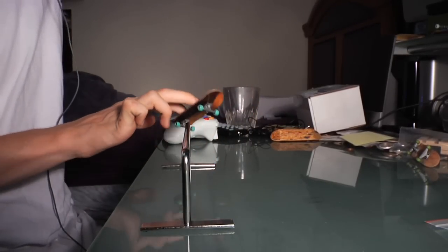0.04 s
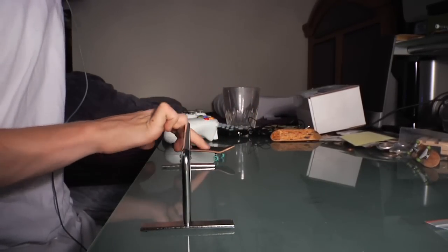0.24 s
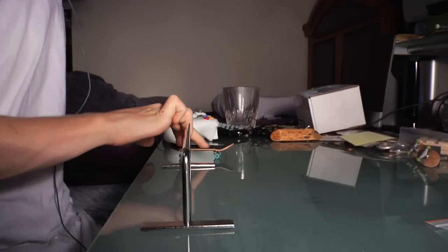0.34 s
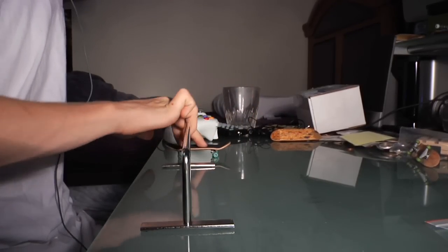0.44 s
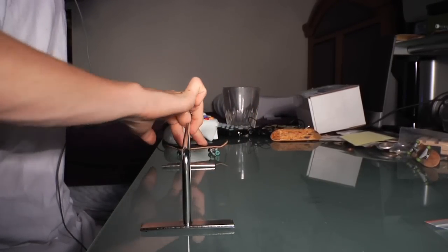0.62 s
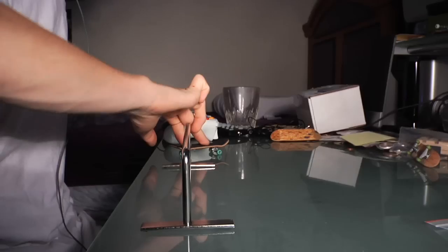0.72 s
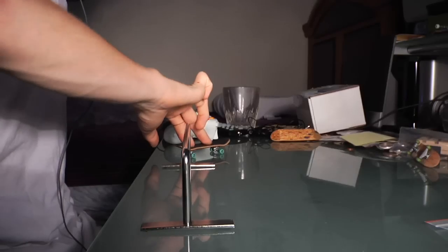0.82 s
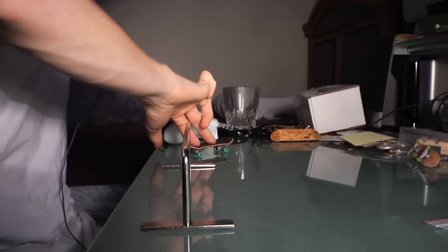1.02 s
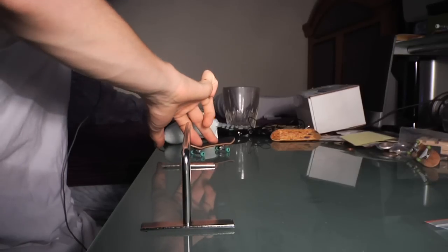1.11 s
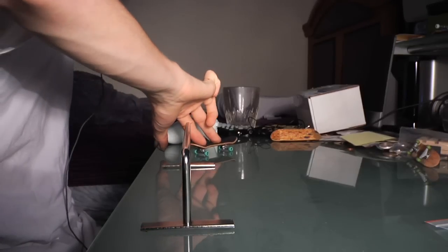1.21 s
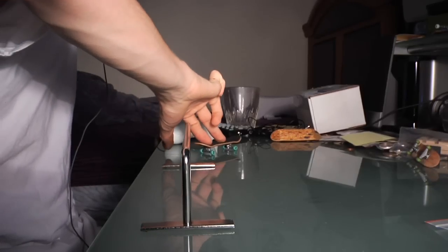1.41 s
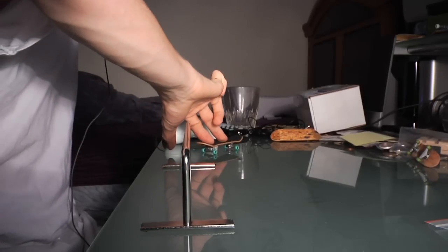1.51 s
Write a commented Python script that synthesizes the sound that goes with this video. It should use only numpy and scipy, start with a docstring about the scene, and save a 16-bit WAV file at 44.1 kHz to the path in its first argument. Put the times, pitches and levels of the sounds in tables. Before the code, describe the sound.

A fingerboard hits a small metal rail and the glass table with one loud, sharp clack, then a short faint metallic squeak; close microphone in a bare, echoing room with low hum and soft air.

```python
"""A fingerboard knocks on a small steel rail and the glass table under it: blows ring modes and noise bursts.
Its metal truck then slips along the rail, which sings near 2.2 kHz: close, unsteady tones with octaves.
A faint scuff, coloured noise plus narrow resonances, dies away from the start.
A deep wavering hum, narrow drones and a soft rush of air run throughout; knock and squeal echo in a bare
room of decaying noise bands, a limiter ducks the loud peaks and the top is cut steeply."""
import sys
import numpy as np
from scipy import signal
from scipy.fft import rfft, irfft
from scipy.io import wavfile
from scipy.ndimage import uniform_filter1d, minimum_filter1d

SR = 44100
rng = np.random.default_rng(int(sys.argv[2]) if len(sys.argv) > 2 else 0)


def transcribe(u):
    """Save the signal u as a 16-bit wav file named by the first command-line argument.

    u: samples, shape (n,) or (channels, n), limited to [-1, 1]; the rate is SR.
    q: integer samples, one column per channel.
    """
    v = np.clip(np.atleast_2d(u).T, -1, 1)
    q = np.round(v * 32767).astype(np.int16)
    wavfile.write(sys.argv[1], SR, q)


N = 68355
T = np.arange(N) / SR
CUTOFF_HZ = 8800

# scuff colour: (frequency [Hz], relative density [dB])
SCUFF_COLOUR = [(300, -20), (900, 6.5), (1500, -4.5), (1900, 7), (2700, 13), (3800, -6), (5000, -5.5),
                (8000, -34.5)]
# narrow resonances in the scuff: (frequency [Hz], width [Hz], level before fading [dB])
SCUFF_TONES = [(1440, 140, -46.5), (2630, 26, -52), (4950, 57, -63)]
SCUFF_DB, SCUFF_T60_S = -44, 0.51

# narrow room drones: (frequency [Hz], width [Hz], level before DRONE_LEVEL [dB])
DRONES = [(164.7, 28.5, -53), (251.6, 10.3, -48.5), (418, 45, -59), (577, 21, -60.5)]
# gain of all drones: (time [s], gain [dB])
DRONE_LEVEL = [(0, 2), (.75, 5), (1.0, -3), (1.55, -3)]
# air rush colour: (frequency [Hz], relative density [dB])
AIR_COLOUR = [(25, -8), (60, 6.5), (110, -0.5), (200, 4), (340, -7), (560, -5), (800, -14), (1300, -15.5),
              (2000, -23.5), (4000, -27), (8500, -32.5)]
HUM_HZ, HUM_DB, HUM_WAVER_DB, HUM_WAVER_HZ = 43.3, -34.5, .8, 6.6
AIR_DB = -44.5

# truck strikes rail and chatters: (time [s], relative level [dB], contact lowpass [Hz], clear-ring gain [dB])
RAIL_HITS = [(.2363, -15.5, 3520, -12), (.2392, -1, 8920, -2), (.2450, -7, 2920, -32.5),
             (.2590, -6, 2500, -7)]
# clear ring of rail and board: (frequency [Hz], relative level [dB], T60 [s])
RAIL_MODES = [(1035, -10, .13), (1225, -21, .12), (1345, -19, .12), (1546, -8, .22), (1742, -5, .1),
              (2164, -24, .25), (2358, -22, .15), (2930, -22, .09), (3252, -20, .17), (3632, -20, .18),
              (4297, -26, .14), (6885, -35, .09)]
# dense rail modes: (frequency [Hz], relative density [dB])
RAIL_CRACK = [(100, -2), (400, -6), (750, -15.5), (1100, -2), (1650, 6), (2000, -5), (3100, -2),
              (4600, -13.5), (7000, -18), (9000, -40)]
# board thumps on table: (time [s], relative level [dB], contact lowpass [Hz], clear-ring gain [dB])
TABLE_HITS = [(.2395, -1, 2026, -4.5), (.2597, 2.5, 1100, -0.5), (.2648, 3, 800, -11.5),
              (.2710, -4, 590, -5)]
# clear ring of the table top: (frequency [Hz], relative level [dB], T60 [s])
TABLE_MODES = [(146.9, -17.5, 0.27), (295.3, -15, .15), (399.3, -24.5, 0.29), (470, -12.5, 0.15),
               (563, -16, 0.24), (609, -16, 0.18), (683.5, -13, 0.07), (747, -23.5, 0.3), (891, -14, 0.077)]
# dense table modes: (frequency [Hz], relative density [dB])
TABLE_THUD = [(60, -11), (170, -3), (280, -5), (550, -2), (900, -4), (2000, -7), (6000, -31.5)]
# relative to each blow
CRACK_DB, CRACK_T60_S, THUD_DB, THUD_T60_S = -11.5, 0.14, -14.5, 0.18
TICK_DB = -3  # bare metal click, relative to each blow
KNOCK_GAIN_DB = 7

# rail sings under the slipping truck, then rings out: (time [s], gain [dB])
SLIP_LEVEL = [(.552, -50), (.563, -33), (.574, -30), (.588, -36), (.602, -26.5), (.621, -37), (.640, -42.5),
              (.675, -59), (.80, -59.5), (.95, -67)]
# tones of the singing rail: (frequency [Hz], relative level [dB])
SQUEAL_TONES = [(2164, 0.5), (2202, 0.5), (2292, -3.5), (2425, -6)]
SQUEAL_PITCH_WAVER_FRACTION, SQUEAL_LEVEL_WAVER_DB, SQUEAL_WAVER_HZ = .009, 1.5, 110
OCTAVE_DB = -19.5  # before the tone's own level is added

# echo colour: (frequency [Hz], gain [dB])
ROOM_GAIN = [(50, 2), (130, -8.5), (250, -5), (480, 3), (900, -3.5), (1600, -9.5), (2600, 4), (3400, -6),
             (4200, -4), (8000, -11)]
# echo decay: (frequency [Hz], T60 [s])
ROOM_T60 = [(100, 0.75), (500, 0.68), (1500, 0.67), (2800, 0.67), (5000, 0.63), (8000, 0.62)]
ROOM_DELAY_S, ROOM_BUILD_S = 0.01, 0.0043
RING_SEND_DB, SQUEAL_SEND_DB = -6, -8  # clear modes are heard mostly close by

LIMIT_DB, RELEASE_DB_PER_S, LIMIT_WINDOW_S = -4, 31, .002


def from_db(db):
    """Decibels to gain."""
    return 10 ** (np.asarray(db) / 20)


def rms_one(x):
    """Scale to unit rms."""
    return x / np.sqrt(np.mean(x ** 2) + 1e-20)


def at_hz(points, hz):
    """Interpolate a curve on a log-frequency axis."""
    point_hz, value = np.transpose(points)
    return np.interp(np.log(hz + 1e-9), np.log(point_hz), value)


def at_time(points):
    """Interpolate a (time, dB) curve over the scene and return it as gain."""
    return from_db(np.interp(T, *np.transpose(points)))


def fade(t60_s):
    """Exponential decay from time zero, down 60 dB at t60_s."""
    return np.exp(-np.log(1000) * T / t60_s)


def drift(rate_hz):
    """Random wander of unit rms: white noise through two equal real poles."""
    pole = np.exp(-2 * np.pi * rate_hz / SR)
    white = rng.standard_normal(2 * N)
    settled = signal.lfilter([1], [1, -2 * pole, pole * pole], white)[N:]
    return rms_one(settled)


def noise(colour):
    """Steady coloured noise of unit rms, empty above the cutoff."""
    hz = np.fft.rfftfreq(N, 1 / SR)
    spectrum = rfft(rng.standard_normal(N)) * from_db(at_hz(colour, hz))
    return rms_one(irfft(spectrum * (hz < CUTOFF_HZ), N))


def narrow_noise(tones):
    """Wavering tones: random drifts modulate a sine and a cosine, giving narrow resonances."""
    out = np.zeros(N)
    for hz, width_hz, db in tones:
        in_phase = drift(width_hz) * np.sin(2 * np.pi * hz * T)
        quadrature = drift(width_hz) * np.cos(2 * np.pi * hz * T)
        out += from_db(db) * rms_one(in_phase + quadrature)
    return out


def scuff():
    """A light, slightly ringing scuff: coloured and narrow noise under one decay."""
    return (from_db(SCUFF_DB) * noise(SCUFF_COLOUR) + narrow_noise(SCUFF_TONES)) * fade(SCUFF_T60_S)


def background():
    """A deep hum of wavering level, narrow-noise drones that swell then ease off, and a rush of air."""
    hum_gain = np.sqrt(2) * from_db(HUM_DB + HUM_WAVER_DB * drift(HUM_WAVER_HZ))
    hum = hum_gain * np.sin(2 * np.pi * (HUM_HZ * T + rng.random()))
    drones = narrow_noise(DRONES) * at_time(DRONE_LEVEL)
    return hum + drones + from_db(AIR_DB) * noise(AIR_COLOUR)


def strike(hits, modes, colour, dense_db, dense_t60_s, click):
    """Blows ring clear modes and dense bursts; softer contacts are duller. Gives (ring, burst)."""
    out = np.zeros((2, N))
    ring = np.zeros(N)
    for k, (hz, db, t60_s) in enumerate(modes):
        sign = (-1) ** k  # neighbouring modes start in opposite phase
        ring += sign * from_db(db) * np.sin(2 * np.pi * hz * T) * fade(t60_s)
    for start_s, db, contact_hz, ring_db in hits:
        burst = from_db(dense_db) * noise(colour) * fade(dense_t60_s) + click * (T == 0)
        pole = np.exp(-2 * np.pi * contact_hz / SR)
        blow = signal.lfilter([1 - pole], [1, -pole], [from_db(ring_db) * ring, burst])
        start = int(start_s * SR)
        out[:, start:] += from_db(db) * blow[:, :N - start]
    return out


def knock():
    """The board hits the rail and the table; each body rings its own modes."""
    rail = strike(RAIL_HITS, RAIL_MODES, RAIL_CRACK, CRACK_DB, CRACK_T60_S, from_db(TICK_DB))
    table = strike(TABLE_HITS, TABLE_MODES, TABLE_THUD, THUD_DB, THUD_T60_S, 0)
    return from_db(KNOCK_GAIN_DB) * (rail + table)


def squeal():
    """Stick and slip drives a few close, unsteady tones, the strongest with a clear octave."""
    out = np.zeros(N)
    for hz, db in SQUEAL_TONES:
        pitch_hz = hz * (1 + SQUEAL_PITCH_WAVER_FRACTION * drift(SQUEAL_WAVER_HZ))
        phase = 2 * np.pi * np.cumsum(pitch_hz) / SR
        swing = from_db(db + SQUEAL_LEVEL_WAVER_DB * drift(SQUEAL_WAVER_HZ))
        octave = from_db(OCTAVE_DB + 2 * db) * np.sin(2 * phase)
        out += swing * (np.sin(phase) + octave)
    active = (T > SLIP_LEVEL[0][0]) * (T < SLIP_LEVEL[-1][0])
    return out * at_time(SLIP_LEVEL) * active


def room_response():
    """Diffuse echo: noise that builds up quickly and decays band by band."""
    hz = np.fft.rfftfreq(N, 1 / SR)
    spectrum = rfft(rng.standard_normal(N)) * from_db(at_hz(ROOM_GAIN, hz))
    edges_hz = np.geomspace(50, 10000, 28)
    out = np.zeros(N)
    for low, high in zip(edges_hz, edges_hz[1:]):
        decay = fade(at_hz(ROOM_T60, np.sqrt(low * high)))
        band = irfft(spectrum * (hz >= low) * (hz < high), N)
        out += band * decay / np.linalg.norm(decay)
    return out * np.clip((T - ROOM_DELAY_S) / ROOM_BUILD_S, 0, 1)


def scene():
    """Knock and squeal with their echo, over scuff and background."""
    ring, burst = knock()
    song = squeal()
    send = burst + from_db(RING_SEND_DB) * ring + from_db(SQUEAL_SEND_DB) * song
    echo = signal.fftconvolve(send, room_response())[:N]
    return (ring + burst + song + echo + scuff() + background())[None]


def limiter(x):
    """Gain drops just ahead of a loud peak and climbs back steadily, so the background ducks and returns."""
    over_db = np.maximum(20 * np.log10(np.abs(x[0]) + 1e-9) - LIMIT_DB, 0)
    climb_db = RELEASE_DB_PER_S * T
    gain_db = climb_db - np.maximum.accumulate(over_db + climb_db)
    size = int(LIMIT_WINDOW_S * SR)
    smooth_db = uniform_filter1d(minimum_filter1d(gain_db, size), size)
    return x * from_db(smooth_db)


def record(dry):
    """A limiter holds the knock down, then a steep elliptic lowpass cuts the top."""
    lowpass = signal.ellip(10, .3, 80, CUTOFF_HZ, fs=SR, output="sos")  # ripple, stopband [dB]
    return signal.sosfilt(lowpass, limiter(dry))


dry = scene()
out = record(dry)
transcribe(out)
```